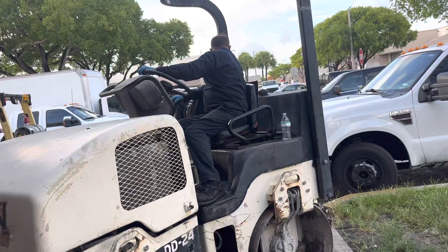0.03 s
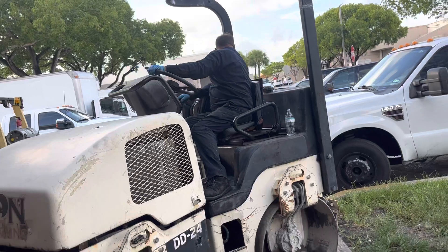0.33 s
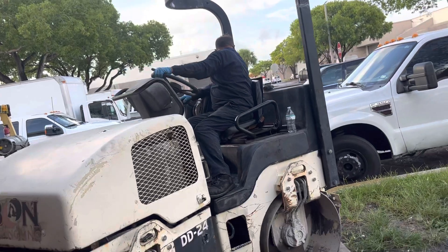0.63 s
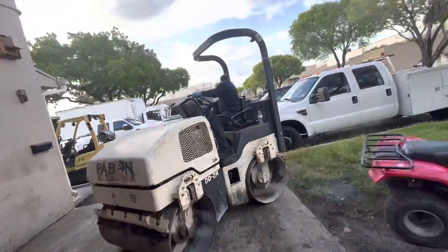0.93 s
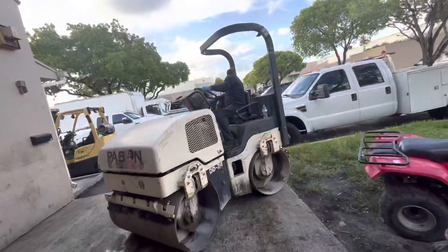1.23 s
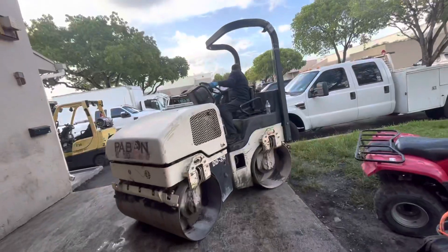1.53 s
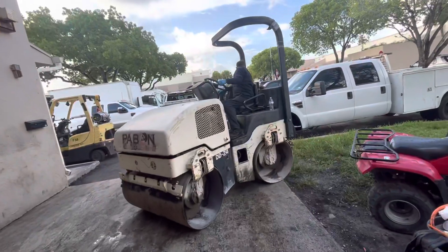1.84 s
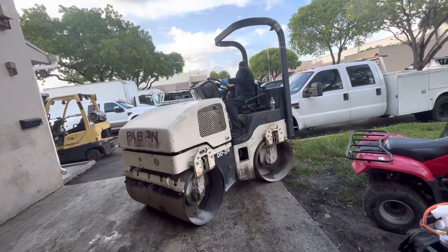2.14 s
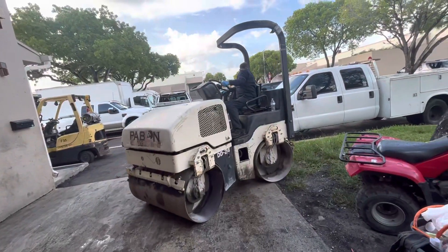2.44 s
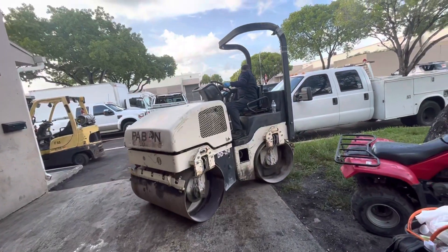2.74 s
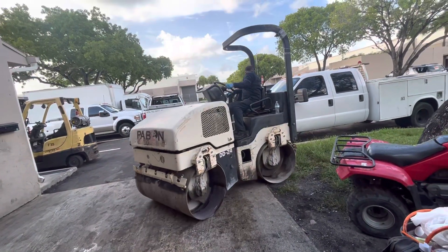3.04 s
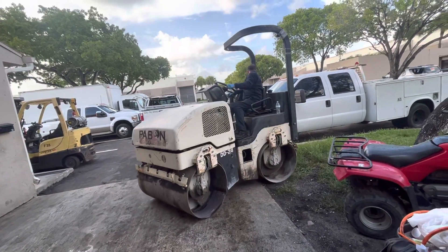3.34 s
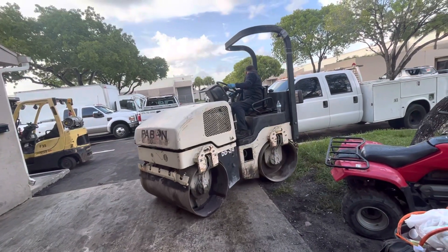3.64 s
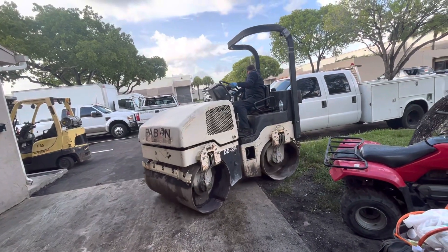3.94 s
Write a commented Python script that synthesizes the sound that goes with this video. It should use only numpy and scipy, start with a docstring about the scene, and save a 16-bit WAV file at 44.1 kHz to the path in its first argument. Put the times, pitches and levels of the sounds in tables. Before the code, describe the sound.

A small road roller's diesel engine runs with a low rumble and rattling steel parts.

```python
"""A paved yard, a stereo microphone a few metres from a small road roller, its three-cylinder diesel running.
From the start the shaft hums, firings boom in exhaust and hood, the block knocks and the valve gear
ticks once a turn. In the first second the hood growls three times and loose steel parts begin to
chatter in short bursts. Past halfway a whine comes up, and near three seconds one part rings out.
The treble stays diffuse throughout, and the level eases slowly."""
import sys
import numpy as np
from scipy import signal
from scipy.fft import rfft, irfft
from scipy.io import wavfile
from scipy.ndimage import uniform_filter1d

SR = 44100
rng = np.random.default_rng(int(sys.argv[2]) if len(sys.argv) > 2 else 0)


def unload_wav(signal):
    """Save mono or channel-first audio to the path in sys.argv[1] as 16-bit WAV at rate SR, clipped to [-1, 1]."""
    wavfile.write(
        sys.argv[1],
        SR,
        np.round(np.clip(np.atleast_2d(signal).T, -1, 1) * 32767).astype(np.int16),
    )


N = 176400
TIME, FREQS = np.arange(N) / SR, np.fft.rfftfreq(N, 1 / SR)
FIRINGS_PER_TURN, PUFF_DECAY_S = 1.5, .014


def undb(db):
    """Decibels to gain."""
    return 10 ** (np.asarray(db) / 20)


def unit(x):
    """Scale to rms 1."""
    return x / np.sqrt(np.mean(x ** 2))


def curve(table):
    """Join rows of seconds and value by straight lines."""
    return np.interp(TIME, *np.array(table).T)


def per_bin(table):
    """Join rows of Hz and value on a log frequency axis."""
    hz, values = np.array(table).T
    return np.interp(np.log(FREQS + 1), np.log(hz), values)


def waver(rate_hz):
    """Smooth random drift with rms 1."""
    hold = int(SR / rate_hz)
    steps = np.repeat(rng.standard_normal(N // hold + 1), hold)
    return unit(uniform_filter1d(uniform_filter1d(steps, hold), hold)[:N])


def colour(x, spectrum):
    """Causal filter with the given spectrum; the output has rms 1."""
    cepstrum = irfft(np.log(undb(per_bin(spectrum))), N)
    cepstrum[1:N // 2] *= 2
    cepstrum[N // 2 + 1:] = 0
    return unit(irfft(rfft(x) * np.exp(rfft(cepstrum)), N))


def decay(kicks, decay_s):
    """Give each kick an exponential tail."""
    return signal.lfilter([1], [1, -np.exp(-1 / (decay_s * SR))], kicks)


def grains(scatter_db=0, samples_apart=60):
    """Two channels of dense tiny impacts over an even bed of noise."""
    count = N // samples_apart
    starts = rng.integers(0, N, count)
    strength = undb(scatter_db * rng.uniform(-1.3, 1, count))
    power = decay(np.bincount(starts, strength ** 2, N), decay_s=.0028)
    return rng.standard_normal((2, N)) * np.sqrt(power + np.mean(power))


def strokes(cycles, decay_s, scatter_db=1, jitter_s=0):
    """Envelope of one decaying blow per cycle, each with its own strength."""
    starts = np.flatnonzero(np.diff(np.floor(cycles)) > 0)
    strength, delay = rng.standard_normal((len(starts), 2)).T
    starts += (jitter_s * SR * delay).astype(int)
    return decay(np.bincount(starts % N, undb(scatter_db * strength), N), decay_s)


def ring(impacts, modes, ring_db):
    """Add a part's ringing; each mode is struck harder or softer as the contact shifts."""
    out = impacts
    for hz, width, db in modes:
        drive = impacts * undb(3.3 * waver(25.19))
        out = out + undb(db + ring_db) * signal.lfilter(*signal.iirpeak(hz, hz / width, SR), drive)
    return out


def harmonics(cycles, orders, waver_db=1.6, swing_rad=.2):
    """Tones at multiples of a cycle rate, each wavering in level and phase."""
    out = 0
    for multiple, db in orders.items():
        gain = undb(db + waver_db * waver(12))
        phase = 2 * np.pi * (multiple * cycles + rng.random()) + swing_rad * waver(13)
        out = out + gain * np.sin(phase)
    return np.sqrt(2) * out


# The image at the microphone. Each row: frequency in Hz, likeness of the two sides from -1 to 1.
STEREO_LIKENESS = [(60, .99), (125, .93), (270, .87), (520, .33), (1000, .2), (7000, .06)]
# Each row: frequency in Hz, left minus right in dB.
STEREO_BALANCE = [(400, 0), (650, -1.5), (950, 3.5), (2400, 0.5), (3400, 1), (5400, 8.5), (7100, 0),
                  (10000, -8), (11700, -0.5)]
def spread(pair):
    """Two unrelated signals become left and right: alike in the bass, diffuse higher up."""
    likeness, tilt = per_bin(STEREO_LIKENESS), undb(per_bin(STEREO_BALANCE))
    mid, side = rfft(pair) * np.sqrt([1 + likeness, 1 - likeness])
    return irfft(np.array([(mid + side) * tilt, mid - side]) / np.sqrt(1 + tilt ** 2), N)


# The whine behind the engine. Each row: time in seconds, pitch in Hz, level in dB.
WHINE = [(1.6, 420, -42), (2.45, 413.3, -33.5), (2.72, 423, -35), (2.92, 413, -41.5), (3.1, 421, -31.5),
         (3.4, 407.8, -34.5), (3.65, 414, -37.5)]
def whine(octave_db=-4.5):
    """A wavering whine, likely the hydraulic drive, with a weaker tone an octave below."""
    times, hz, db = np.array(WHINE).T
    cycles = np.cumsum(np.interp(TIME, times, hz)) / SR
    return harmonics(cycles, {.5: octave_db, 1: 0}) * undb(np.interp(TIME, times, db))


# Ringing steel parts. Each row: frequency in Hz, width in Hz, relative level in dB.
STEEL_MODES = [(3608, 50, -6.5), (4466, 35, -4.5), (5346, 42, 1), (7255, 140, -3), (8648, 120, -5),
               (10115, 100, 0)]
# The ticking's tone. Each row: frequency in Hz, relative level in dB.
TICK_SPECTRUM = [(1000, -10.5), (2300, -0.5), (4300, 4.5), (6300, 0), (9700, -2), (12800, -14.5),
                 (13800, -37)]
# Each row: time in seconds, level of the ticking in dB.
TICK_LEVEL = [(0.05, -30.5), (.27, -33.5), (.95, -26.5), (2.2, -29), (4, -30.5)]
def valve_gear(turns, steady=2.4, flutter_db=1.19):
    """Fine metallic ticking that swells once a turn and flutters as the machine shakes."""
    ticks = (strokes(turns, decay_s=.02) + steady) * grains()
    ringing = ring(ticks, STEEL_MODES, ring_db=.5 + .5 * TIME)
    return colour(spread(ringing), TICK_SPECTRUM) * undb(curve(TICK_LEVEL) + flutter_db * waver(39.4))


def ping(start_s=2.949, peak_db=-23):
    """A loose part is hit cleanly once and rings on the lowest steel mode."""
    hz, width, _ = STEEL_MODES[0]
    age = np.maximum(TIME - start_s, 0)
    return undb(peak_db) * np.sin(2 * np.pi * hz * age) * np.exp(-np.pi * width * age / 2)


# Rattles. Each row: start in seconds, relative level in dB, length in seconds, clank over chatter in dB.
RATTLE_BURSTS = [(0.139, -20.5, 0.035, 5.5), (0.332, -26, 0.086, 5.5), (0.446, -18.5, 0.012, 1),
                 (0.537, -20.5, 0.014, 1.5), (0.607, -23.5, 0.067, 6), (0.785, -24.5, 0.015, 9.5),
                 (0.947, -12.5, 0.016, -1.5), (1, -18.5, .04, -3.5), (1.064, -17.5, 0.017, -1),
                 (1.128, -15.5, 0.015, 0), (1.624, -13.5, 0.034, -8), (1.774, -20.5, 0.059, 2.5),
                 (1.87, -18.5, 0.014, -0.5), (1.96, -17.5, 0.022, 0), (2.027, -16.5, 0.028, -4),
                 (2.428, -17, 0.013, 1), (2.485, -19.5, 0.022, 1), (2.768, -17.5, 0.017, -5),
                 (2.946, -16, 0.0064, -10), (3.07, -12, 0.0081, -7), (3.1, -22, 0.031, 2),
                 (3.124, -15, 0.018, -3.5), (3.308, -23.5, 0.04, -23), (3.461, -16.5, 0.025, -4)]
# Bright chatter and dull clank. Each row: frequency in Hz, relative level in dB.
CHATTER_SPECTRUM = [(1500, -17), (4500, 4.5), (8700, 10.5), (10200, 7.5), (11500, 0.5), (12800, 1),
                    (13600, -42)]
CLANK_SPECTRUM = [(500, -6.5), (1500, 6.5), (3500, 6), (5400, -2.5), (8000, -18)]
def loose_parts(attack_s=.002, release_s=.017, gain_db=-8):
    """Loose steel chatters in sharp bursts that die away; each burst also carries its own share of duller
    clank, most in the early bursts."""
    chatter_power = clank_power = out = 0
    for start, db, length, clank_db in RATTLE_BURSTS:
        attack = np.clip((TIME - start) / attack_s, 0, 1)
        release = np.exp(-np.maximum(TIME - start - length, 0) / release_s)
        burst = undb(db) * attack * release
        chatter_power += burst ** 2
        clank_power += (burst * undb(clank_db)) ** 2
    for power, spectrum in ((chatter_power, CHATTER_SPECTRUM), (clank_power, CLANK_SPECTRUM)):
        impacts = np.sqrt(power) * grains(scatter_db=13.5, samples_apart=90)
        ringing = ring(impacts, STEEL_MODES, ring_db=7.5)
        out += colour(spread(ringing), spectrum) * np.sqrt(np.mean(power))
    return out * undb(gain_db)


# The panels' tones. Each row: multiple of the shaft speed, relative level in dB.
DRONE_ORDERS = {5: -6.5, 8: 0, 9: -2.5}
# Each row: time in seconds, gain of the drone in dB.
DRONE_GAIN = [(.4, -34), (.75, -26), (1, -34), (1.5, -29.5), (2.7, -43.5), (3.6, -38), (3.7, -25.5),
              (4, -36)]
def hood_drone(turns):
    """The hood panels drone at higher multiples of the shaft speed."""
    return harmonics(turns, DRONE_ORDERS) * undb(curve(DRONE_GAIN))


# Surges of the hood. Each row: time of the peak in seconds, level there in dB.
GROWL_SURGES = [(.17, -24), (.43, -25), (.67, -26)]
# The growl's tone. Each row: frequency in Hz, relative level in dB.
GROWL_SPECTRUM = [(250, -26.5), (490, 10), (900, -30.5)]
def hood_growl(turns, width_s=.057, steady=.5):
    """Close to the microphone, the firings make the hood growl in short surges."""
    surges = sum(undb(db) * np.exp(-((TIME - peak) / width_s) ** 2) for peak, db in GROWL_SURGES)
    puffs = strokes(turns * FIRINGS_PER_TURN, PUFF_DECAY_S) + steady
    return colour(spread(puffs * rng.standard_normal((2, N))), GROWL_SPECTRUM) * surges


# The hum's tones. Each row: multiple of the shaft speed, relative level in dB.
HUM_ORDERS = {1: -38.5, 2: -31.5, 3: -24.5}
# Each row: time in seconds, gain of the hum in dB.
HUM_GAIN = [(0, 2), (.45, 2.5), (1, 0), (1.8, -2.5), (3.15, -1), (3.5, -4), (4, -3)]
def shaft_hum(turns):
    """Shaft and exhaust hum low, in step with the turning."""
    return harmonics(turns, HUM_ORDERS) * undb(curve(HUM_GAIN))


# Ringing hood and block. Each row: frequency in Hz, width in Hz, relative level in dB.
BLOCK_MODES = [(476, 8, -1.5), (826, 30, -3), (1615, 30, -1.5)]
# The knock's tone. Each row: frequency in Hz, relative level in dB.
KNOCK_SPECTRUM = [(250, -9.5), (370, 2.5), (460, 0.5), (600, -4), (830, -1), (1050, 0), (1700, -3.5),
                  (2100, -9), (3000, -9.5), (6000, -35.5)]
# Each row: time in seconds, level of the knock in dB.
KNOCK_DB = [(.17, -22), (.28, -23.5), (.67, -23), (.9, -22.5), (2.6, -25), (4, -24)]
def block_knock(turns, steady=3.1):
    """The block knocks loosely in time with the firings, and rings along with the hood."""
    blows = strokes(turns * FIRINGS_PER_TURN, decay_s=.0032, jitter_s=.004)
    ringing = ring((blows + steady) * grains(), BLOCK_MODES, ring_db=.5)
    return colour(spread(ringing), KNOCK_SPECTRUM) * undb(curve(KNOCK_DB) + 1.2 * waver(22.07))


# Deep rumble and the boom above it. Each row: frequency in Hz, relative level in dB.
RUMBLE_SPECTRUM = [(15, -43), (38, -13), (50, 6), (78, 4), (116, 7.5), (145, 2.5), (220, -41.5)]
BOOM_SPECTRUM = [(90, -29), (140, -2), (205, 2), (290, 2), (370, -4.5), (500, -22.5), (1000, -59.5)]
# Their strength a few metres off. Each row: time in seconds, level in dB.
RUMBLE_DB = [(0, -23), (.5, -26.5), (1.1, -29), (2.25, -27.5), (3.3, -32), (3.6, -27.5), (4, -31.5)]
BOOM_DB = [(0, -22), (.7, -24.5), (1.05, -27.5), (1.4, -25.5), (2, -25.5), (2.55, -31), (2.98, -30.5),
           (3.15, -26.5), (3.62, -28), (3.68, -26), (4, -29)]
def exhaust(turns):
    """Three firings in two turns: each puff of gas rumbles and booms."""
    puffs = strokes(turns * FIRINGS_PER_TURN, PUFF_DECAY_S)
    out = 0
    for spectrum, level in ((RUMBLE_SPECTRUM, RUMBLE_DB), (BOOM_SPECTRUM, BOOM_DB)):
        gas = spread(puffs * rng.standard_normal((2, N)))
        out += colour(gas, spectrum) * undb(curve(level))
    return out


# The engine's pace. Each row: time in seconds, shaft speed in turns per second.
SHAFT_SPEED = [(0, 32.55), (.55, 32.55), (.75, 32.2), (1.9, 32.2), (2.3, 32.55), (2.9, 32.9), (3.35, 32.8),
               (4, 32.4)]
def scene():
    """The roller in the yard: one shaft paces the engine, with whine and loose steel around it."""
    turns = np.cumsum(curve(SHAFT_SPEED) * (1 + .002 * waver(8))) / SR
    bodywork = loose_parts() + ping() + hood_drone(turns) + hood_growl(turns)
    engine = valve_gear(turns) + shaft_hum(turns) + block_knock(turns) + exhaust(turns)
    return whine() + bodywork + engine


def record(dry, start_s=.035, gap_end_s=.78, gap_hz=(7700, 9100), top_hz=14300):
    """The sound cuts in, a narrow treble band is missing at first, and the top is cut off."""
    band = irfft(rfft(dry) * ((FREQS > gap_hz[0]) & (FREQS < gap_hz[1])), N)
    gap = np.clip((gap_end_s - TIME) / .02 + 1, 0, 1)
    fade_in = np.clip((TIME - start_s) / .002, 0, 1)
    lowpass = signal.ellip(8, .2, 80, top_hz, fs=SR, output="sos")
    return signal.sosfilt(lowpass, (dry - band * gap) * fade_in)


dry = scene()
out = record(dry)
unload_wav(out)
```